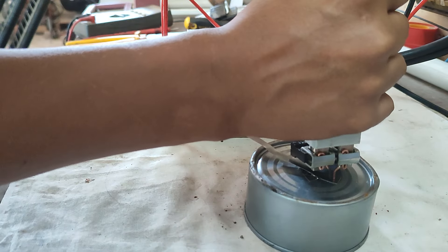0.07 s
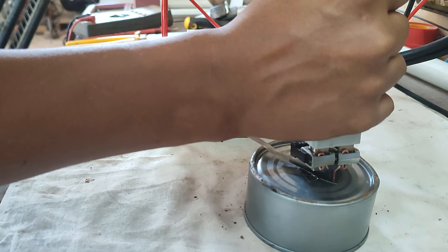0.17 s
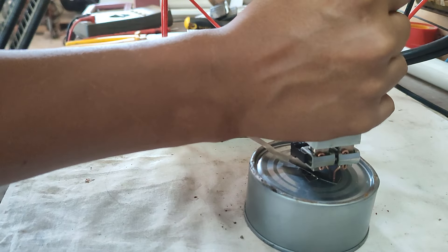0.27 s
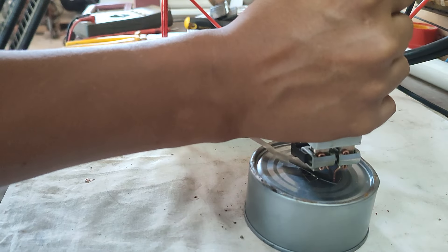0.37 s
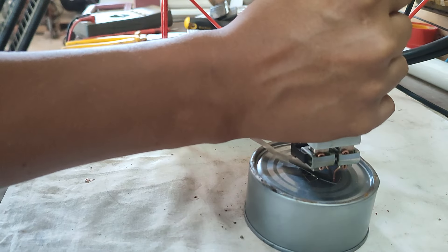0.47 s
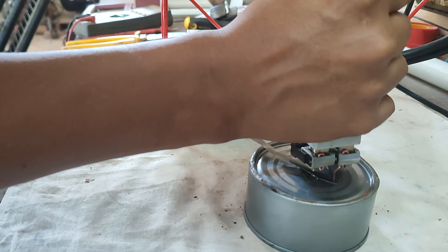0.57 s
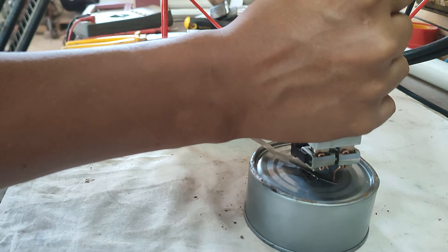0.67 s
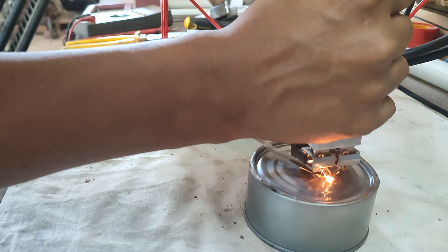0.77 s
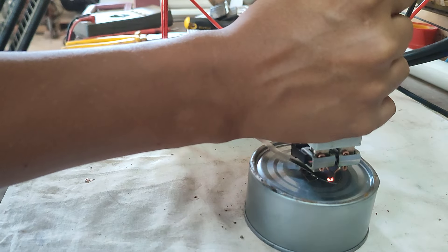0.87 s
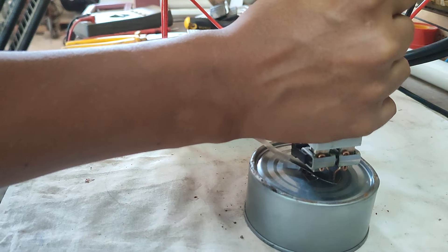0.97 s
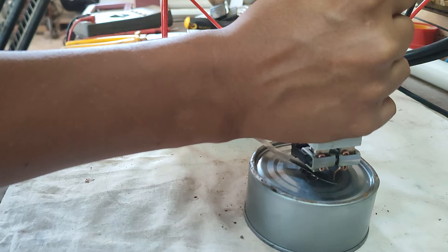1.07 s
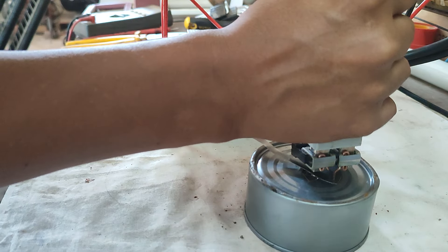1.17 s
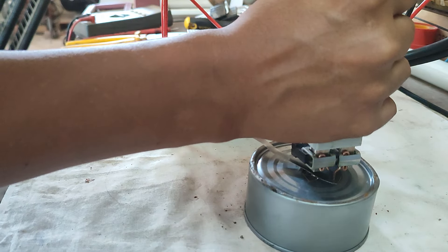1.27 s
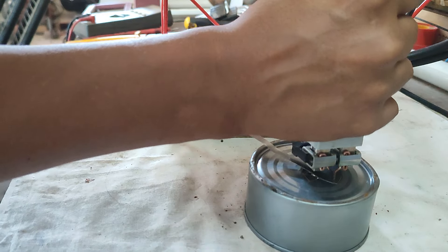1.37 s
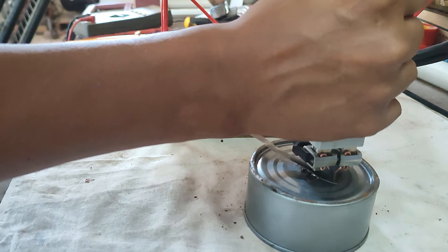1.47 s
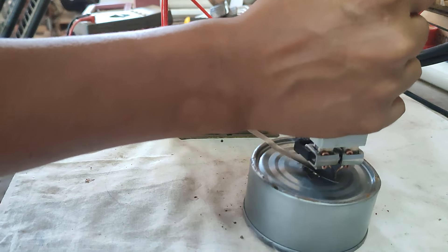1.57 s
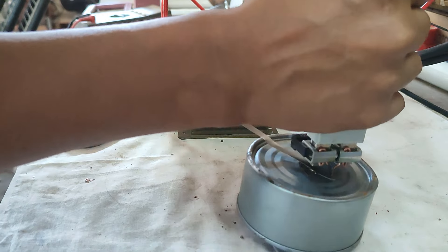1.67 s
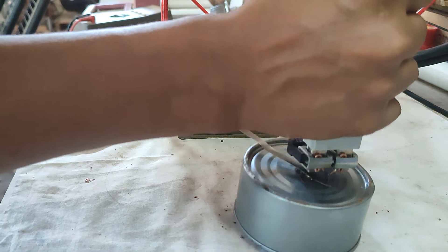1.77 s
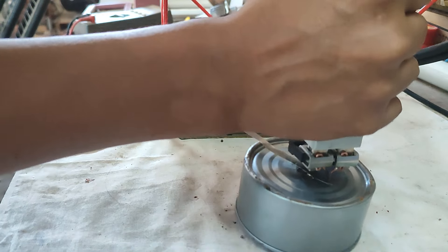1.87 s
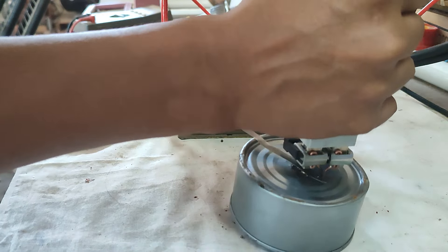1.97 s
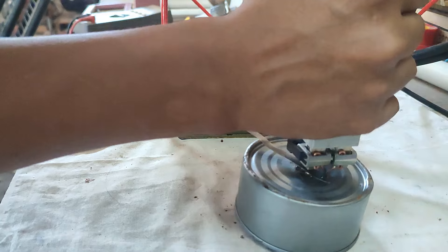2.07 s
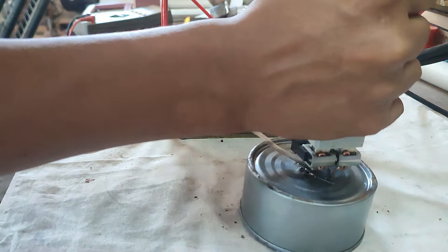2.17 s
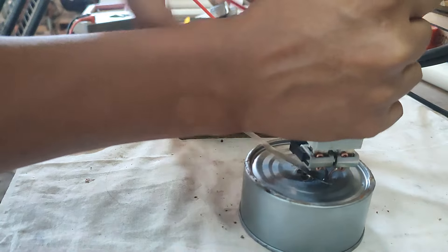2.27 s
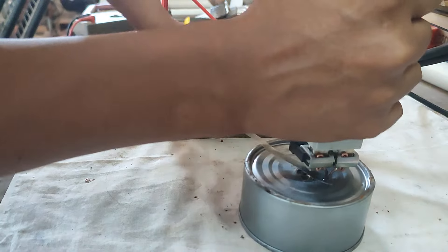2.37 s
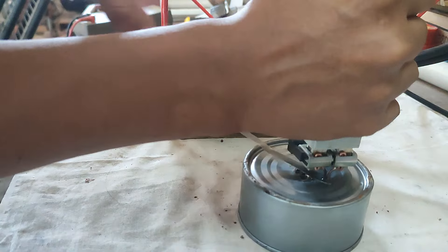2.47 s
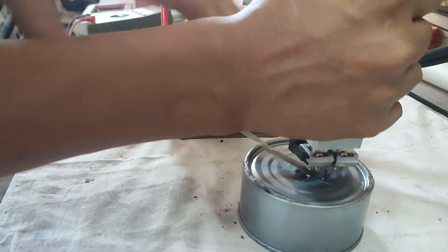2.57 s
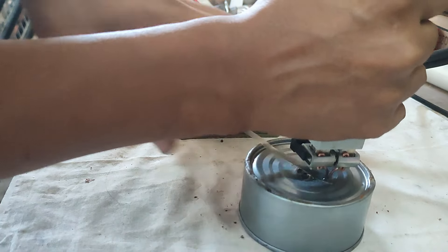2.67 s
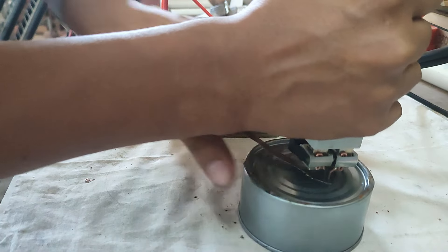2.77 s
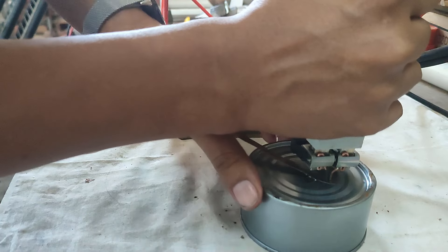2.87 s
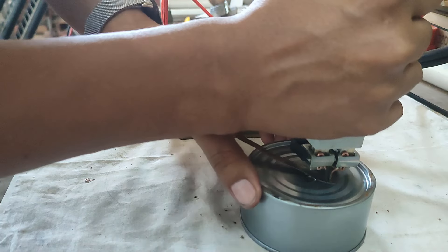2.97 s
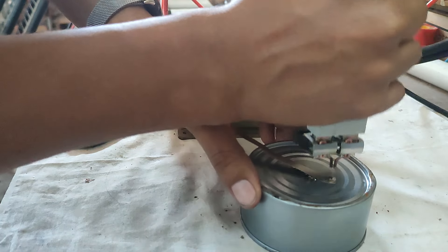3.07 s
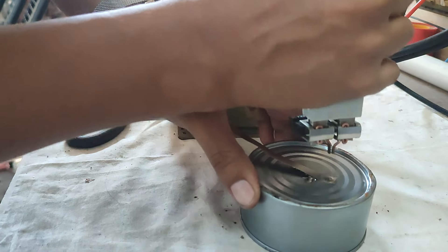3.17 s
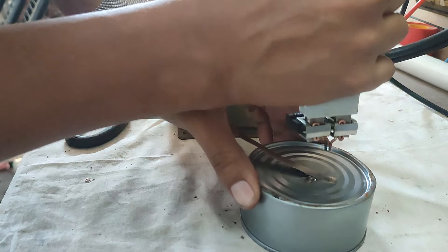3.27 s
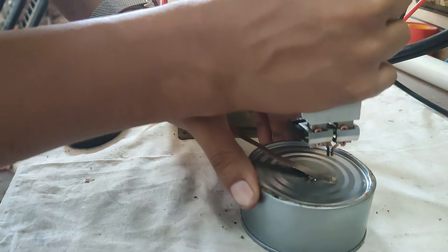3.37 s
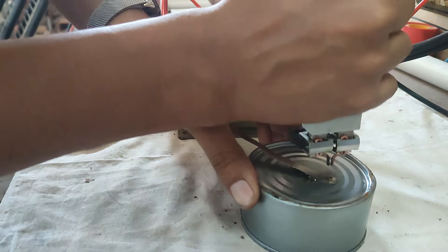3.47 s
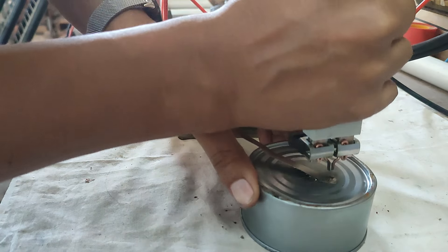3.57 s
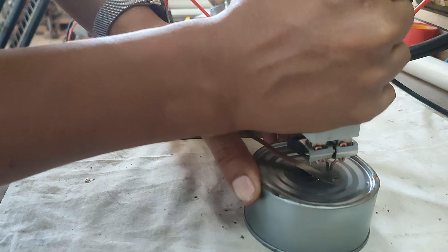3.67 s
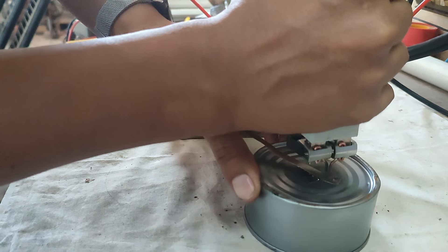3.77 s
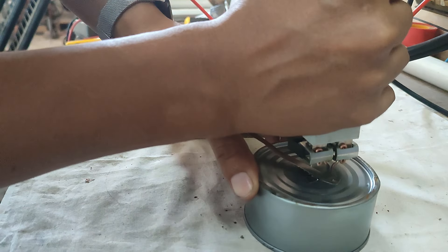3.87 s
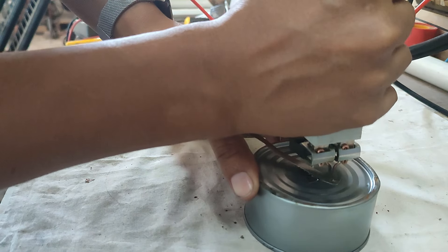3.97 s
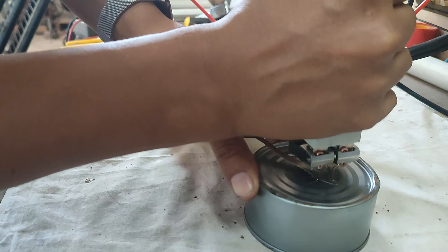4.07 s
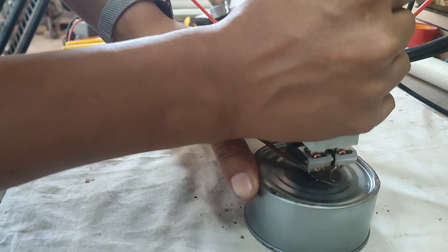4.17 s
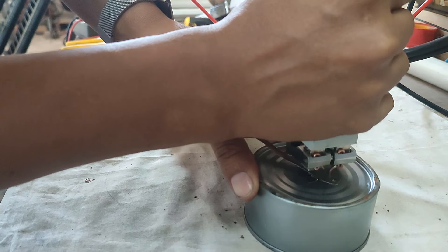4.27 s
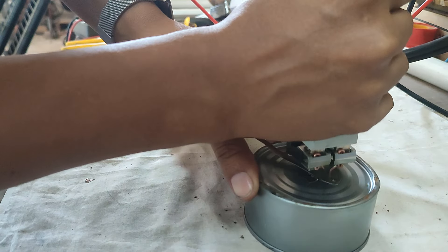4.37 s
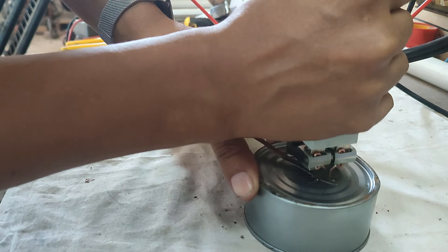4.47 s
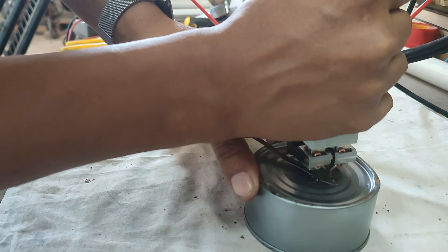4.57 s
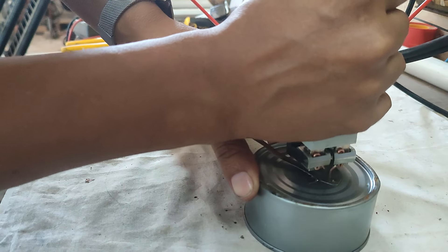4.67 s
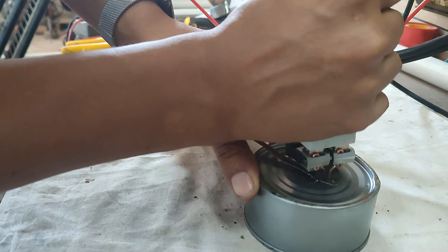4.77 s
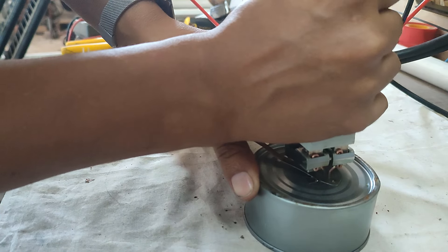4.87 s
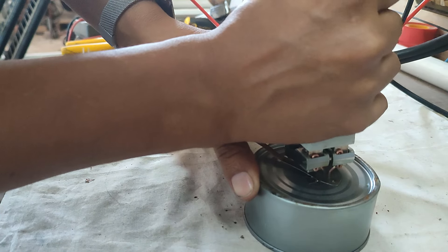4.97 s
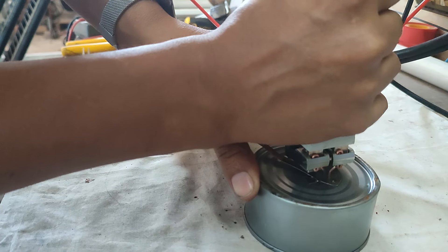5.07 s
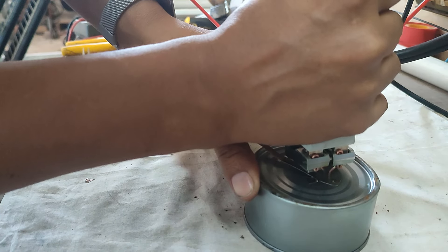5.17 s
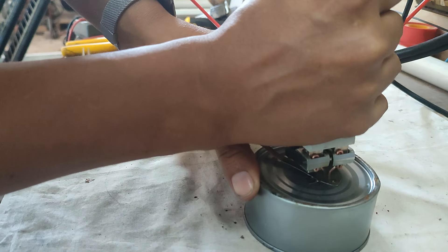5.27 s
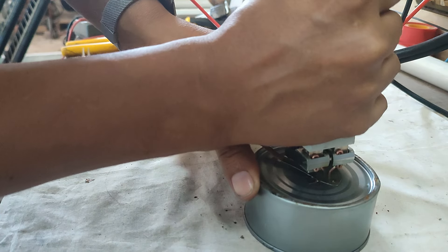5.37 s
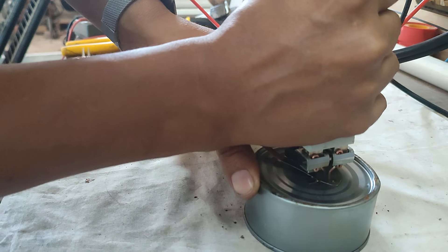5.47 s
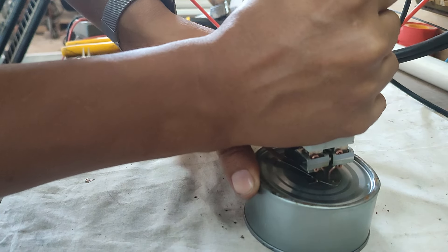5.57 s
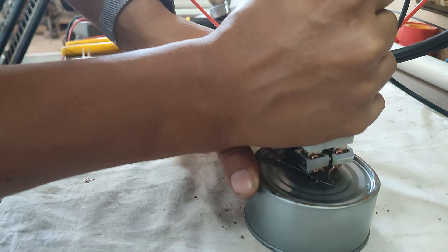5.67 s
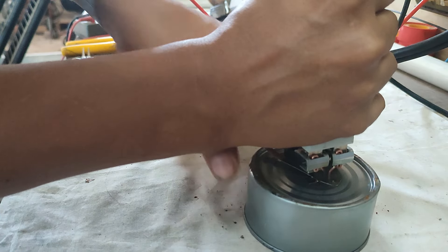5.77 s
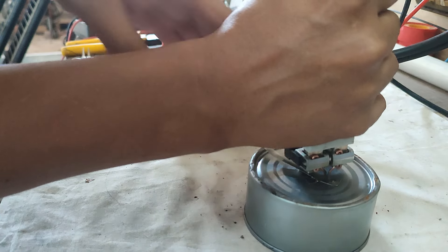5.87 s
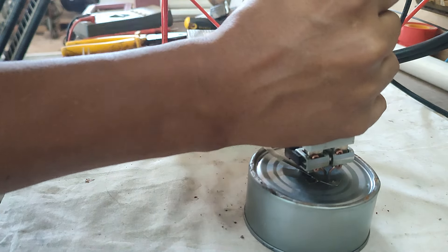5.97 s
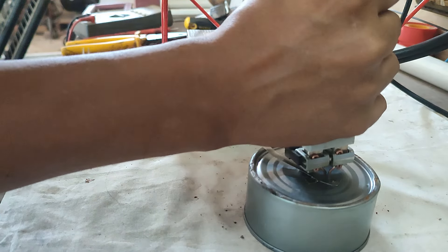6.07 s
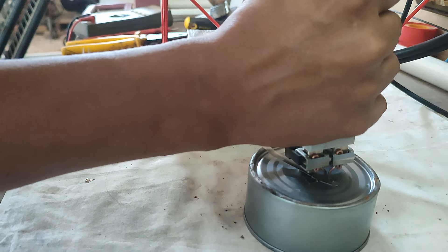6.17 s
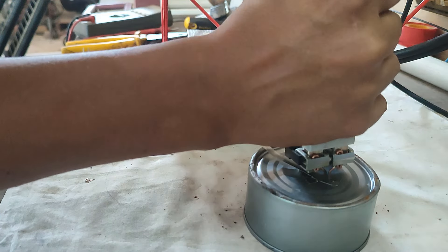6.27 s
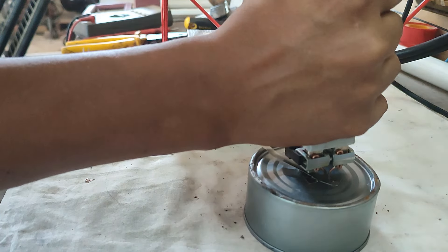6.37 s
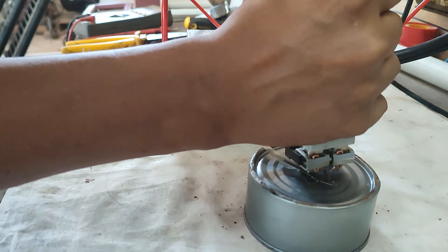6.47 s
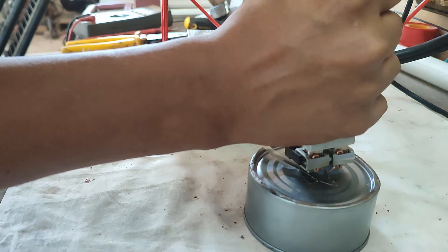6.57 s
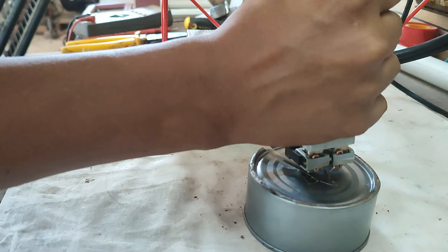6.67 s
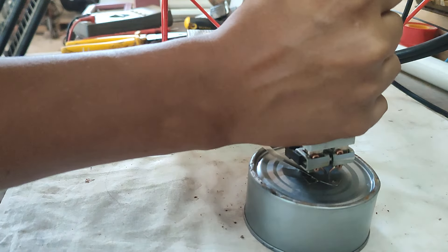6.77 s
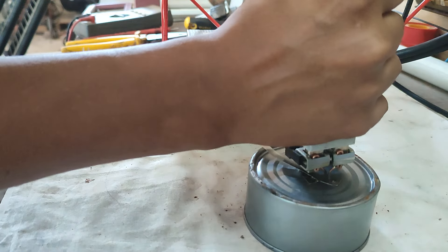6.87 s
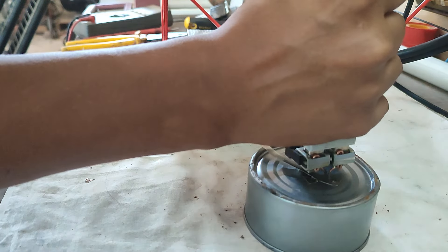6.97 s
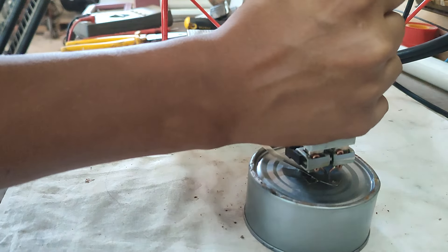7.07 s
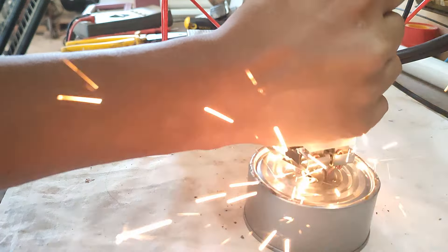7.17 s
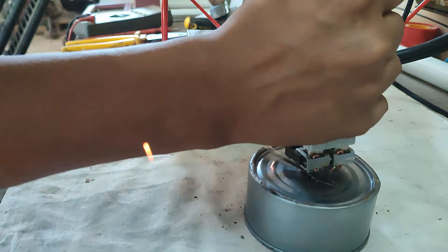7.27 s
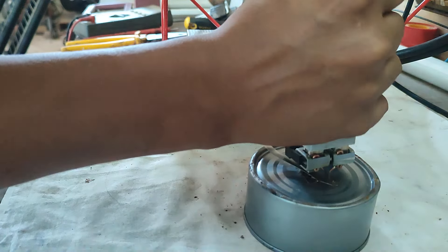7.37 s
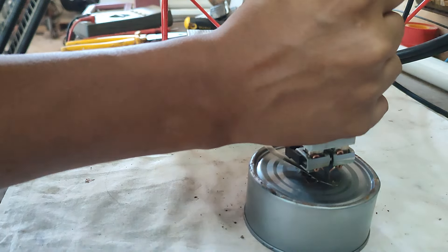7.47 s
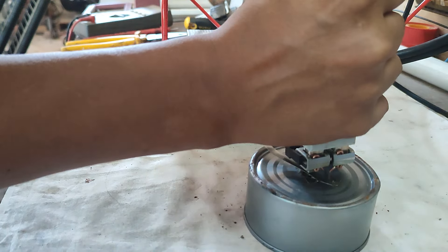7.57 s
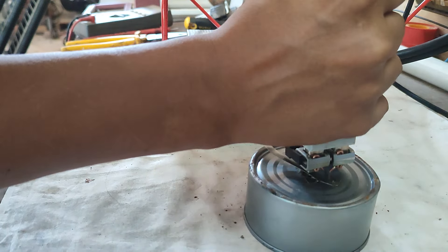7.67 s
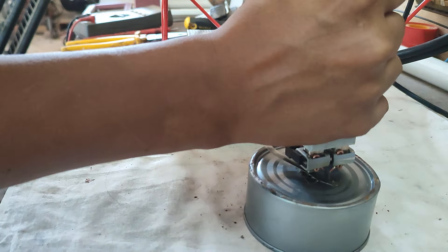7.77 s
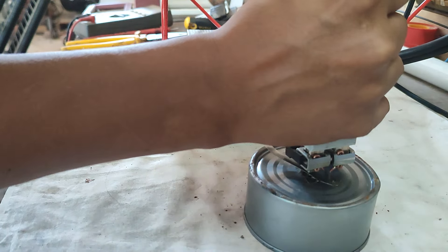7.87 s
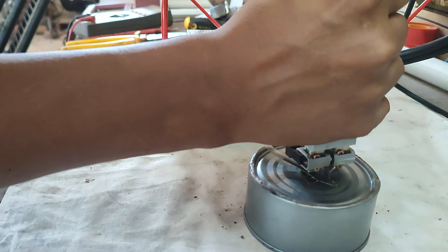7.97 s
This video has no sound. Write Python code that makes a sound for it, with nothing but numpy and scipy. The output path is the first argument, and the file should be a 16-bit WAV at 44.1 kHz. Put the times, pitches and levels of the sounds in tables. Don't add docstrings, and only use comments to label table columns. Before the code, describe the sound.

Soft taps and dull electric buzz on thin tin, hollow knocks and cloth rubbing, then a very loud dry spark crack and short sizzle.

```python
import sys
import numpy as np
from scipy import signal
from scipy.io import wavfile
from scipy.ndimage import uniform_filter1d

SR = 44100
rng = np.random.default_rng(int(sys.argv[2]) if len(sys.argv) > 2 else 0)


def invert_db(level):
    return 10 ** (np.asarray(level, dtype=float) / 20)


def wrap_up_sound(samples):
    columns = np.atleast_2d(samples).T
    tamed = np.clip(columns, -1, 1)
    steps = np.round(tamed * 32767).astype(np.int16)
    wavfile.write(sys.argv[1], SR, steps)


N = 352976

TAP_MS, KNOCK_MS, PEEL_MS, BRUSH_MS = 0.49, 1, 1, 7.4
# start_s, ring_db, crack_db, crack_hz, left_right_db
KNOCKS = [
    (2.2993, -40, -41.5, 2070, -2),
    (2.3232, -24, -32.5, 1500, -3),
]


def rms_one(x):
    return x / np.sqrt(np.mean(x ** 2) + 1e-20)


def at_hz(points, hz):
    points = np.array(points)
    return np.interp(np.log(hz), np.log(points[:, 0]), points[:, 1])


def sides(pan_db):
    return invert_db(np.array([[.5], [-.5]]) * pan_db)


def add(out, s, sound):
    at = int(round(s * SR))
    out[:, at:at + sound.shape[1]] += sound[:, :N - at]


def drift(rate):
    r = np.exp(-80 * np.pi * rate / SR)
    slow = signal.lfilter([1], [1, -2 * r, r * r], rng.standard_normal(N // 40 + 2002))[2000:]
    return np.interp(np.arange(N) / 40, np.arange(len(slow)), rms_one(slow))


def band_pass(x, order, edges):
    return signal.sosfilt(signal.butter(order, edges, "band", fs=SR, output="sos"), x)


def resonate(x, hz, width):
    r = np.exp(-np.pi * width / SR)
    return signal.lfilter(np.array([1, 0, -1]) * (1 - r * r) / 2, [1, -2 * r * np.cos(2 * np.pi * hz / SR), r * r], x)


def pair():
    return rng.standard_normal((2, N))


def spread(x, hz):
    # pitch_hz, left_right_likeness
    likeness = [(60, 0.92), (180, 1), (550, 0.1), (1650, -0.14), (4970, -0.035), (15000, -0.11)]
    # pitch_hz, left_right_db
    lean = [(60, -1.5), (240, -2.5), (950, 0), (3770, -2.5), (15000, -1.5)]
    alike = np.clip(at_hz(likeness, hz), -1, 1)
    shared = np.sqrt(1 + alike) * x[0]
    opposed = np.sqrt(1 - alike) * x[1] * [[1], [-1]]
    return (shared + opposed) * sides(at_hz(lean, hz))


def banded_noise(spectrum, patchy_db):
    out, white = 0, [pair(), pair()]
    edges = 28 * 2 ** np.arange(0, 9.6, .5)
    for k, (low, high) in enumerate(zip(edges, edges[1:])):
        hz = np.sqrt(low * high)
        level_db = at_hz(spectrum, hz)
        if level_db > -60:
            band = band_pass(white[k % 2], 2, [low, high])
            flicker = invert_db(patchy_db * drift(7.4))
            out = out + invert_db(level_db) * flicker * spread(band, hz)
    return out / np.std(out.mean(axis=0))


def burst(hz, t60, octaves=1.5):
    t = np.arange(SR // 5) / SR
    noise = rng.standard_normal((3, len(t)))
    half = 2 ** (octaves / 2)
    edges = np.clip([hz / half, hz * half], 50, 19000)
    return rms_one(band_pass(noise[0] + 3.9 * noise[1:], 2, edges)) * invert_db(-60 * t / t60)


def struck(modes, hits, contact_ms, uneven_db=5.5, turn=1.53, split=0.0253):
    out, t = np.zeros((2, N)), np.arange(SR // 3) / SR
    hz, mode_db, t60 = np.repeat(np.transpose(modes), 3, axis=1)[:, :, None]
    detuned = (np.arange(len(hz)) % 3 > 0)[:, None]
    hz = hz * (1 + split * rng.uniform(-0.924, 1, hz.shape) * detuned)
    angle = turn * rng.standard_normal(hz.shape)
    waves = np.array([np.sin(2 * np.pi * hz * t + side * angle) for side in (.5, -.5)])
    dying = invert_db(mode_db - 60 * t / t60) * waves
    rise = 1 - np.exp(-1000 * t / contact_ms)
    for s, ring_db, crack_db, crack_hz, pan_db in hits:
        heights = invert_db(ring_db - 7.0 + uneven_db * rng.standard_normal(len(hz)))
        add(out, s, heights @ dying * rise * sides(pan_db))
        add(out, s, invert_db(crack_db) * burst(crack_hz, 0.047, octaves=2.83) * sides(pan_db))
    return out


def dry_contacts(rows, t60, dulling=0):
    out = np.zeros((2, N))
    for s, db, hz, pan_db in rows:
        fade = t60 * (4000 / hz) ** dulling
        add(out, s, invert_db(db) * burst(hz, fade, octaves=1.37) * sides(pan_db))
    return out


def swells(rows, width_hz=0, width_share=0):
    out, white = np.zeros((2, N)), pair()
    for s, length, hz, db in rows:
        reach, width = length + .2, width_hz + width_share * hz
        t = np.arange(-reach, reach, 1 / SR)
        noise = np.roll(white, -int(s * SR), axis=1)[:, :len(t)]
        tone = spread(rms_one(resonate(resonate(noise, hz, width), hz, width)), hz)
        add(out, s - reach, invert_db(db) * tone * np.exp(-(2 * t / length) ** 2))
    return out


def background():
    # time_s, level_db
    nearness = [(0.0, -59), (0.89, -59.5), (1.83, -60.5), (2.41, -58.5), (4.12, -57.5), (4.63, -57),
                (6.13, -55), (6.57, -56.5), (6.91, -55), (8.0, -56)]
    # pitch_hz, level_db_per_hz
    air = [(15, -37), (25, 2), (57, -0.5), (91, -13), (187, -16), (220, -5), (252, -16), (296, -19.5),
           (320, -19), (419, -24), (644, -28), (938, -27), (1370, -33.5), (3220, -45), (15300, -51)]
    # pitch_hz, width_hz, level_db
    drones = [(59.2, 17, -63), (104.6, 11.2, -65.5), (160, 5.9, -72.5), (223.5, 11, -73.5),
              (420, 65, -74.5)]
    near_db = np.interp(np.arange(N) / SR, *np.transpose(nearness))
    out = invert_db(-56.5) * banded_noise(air, patchy_db=2.5)
    for hz, width, db in drones:
        follows = 0.7 if hz < 80 else 1.3
        swell_db = follows * (near_db - near_db.mean())
        out += invert_db(db + swell_db + 1.72 * drift(1.8)) * spread(rms_one(resonate(pair(), hz, width)), hz)
    return out


def rubbing():
    # fastest_s, build_up_s, slowing_s, rub_db, hiss_above_rub_db
    moves = [(.91, 0.45, 0.31, -72, 0), (1.7, 0.32, 0.97, -75, -3.5), (2.2, 0.27, 0.072, -74.5, 0.5),
             (2.47, 0.2, 0.27, -67.5, -14.5), (2.99, 0.098, 0.68, -55.5, -11),
             (3.5, 0.097, 0.55, -61.5, -9), (3.78, 1.3, 0.99, -56, -7), (4.3, 0.22, 0.98, -73, -3),
             (5.122, 0.2, 0.54, -78.5, 12), (5.27, 0.17, 0.84, -68.5, -7), (6.8, 0.64, 1, -76, -7),
             (7.4, 0.31, 0.53, -66, -17)]
    # pitch_hz, level_db_per_hz
    rub_colour = [(350, -7), (600, -3.5), (1280, -7), (1970, -4), (2590, 4.5), (3000, -1), (5280, -8),
                  (7090, -5), (9000, -19.5), (11700, -44), (19800, -120)]
    # pitch_hz, level_db_per_hz
    hiss_colour = [(3000, -86), (5000, -11.5), (8000, 8), (12500, -11), (18000, 4.5)]
    t = np.arange(0, N + 64, 64) / SR
    rub, hiss = invert_db(2 * -80), invert_db(2 * -86)
    for s, build_up, slowing, db, bright_db in moves:
        power = invert_db(2 * (db - 20 * np.maximum((s - t) / build_up, (t - s) / slowing)))
        rub, hiss = rub + power, hiss + power * invert_db(2 * bright_db)
    rub, hiss = (np.sqrt(np.interp(np.arange(N) / SR, t, p)) for p in (rub, hiss))
    friction = rub * banded_noise(rub_colour, patchy_db=1.7) + hiss * banded_noise(hiss_colour, patchy_db=2.0)
    stutter_db, stutter_per_s = 1.24, 27
    return friction * invert_db(stutter_db * drift(stutter_per_s))


def pressed_can():
    # pitch_hz, level_db, t60_s
    damped_modes = [(553, -16, 0.13), (616, -4, 0.034), (755, -13, 0.028), (830, -3, 0.034), (914, 1, 0.07),
                    (913, -22, 0.1), (1096, -12, 0.11), (1260, -7.5, 0.023), (1475, -11, 0.072),
                    (1800, -16, 0.045), (2880, -16, 0.019), (4290, -29.5, .08), (7014, -21.5, 0.063)]
    # start_s, ring_db, crack_db, crack_hz, left_right_db
    presses = [(0.8011, -45, -54.5, 3100, -5), (0.8097, -41.5, -73, 1500, 5), (0.824, -47, -69, 3000, -10),
               (0.9125, -47, -57, 5040, -3), (0.9634, -51, -72, 1800, -8), (0.978, -54.5, -71, 4500, -3),
               (7.2385, -45.5, -50, 4000, 4), (7.261, -51, -60, 3020, 1)]
    return struck(damped_modes, presses, TAP_MS)


def weld_hum():
    # pitch_hz, level_db
    orders = [(100, 2), (200, -10), (300, -14.5), (400, -21), (500, -16)]
    start_s, attack_s, hold_s, release_s = .805, 0.02, 0.18, 0.068
    hum_db, sag_db_per_s = -45, 86
    since, out = np.arange(SR // 2) / SR, np.zeros((1, N))
    tone = sum(invert_db(db) * np.sin(2 * np.pi * hz * (since + start_s - .0105)) for hz, db in orders)
    gate = np.clip(np.minimum(since / attack_s, 1 - (since - attack_s - hold_s) / release_s), 0, 1)
    level_db = hum_db - sag_db_per_s * np.clip(since - attack_s, 0, 1)
    add(out, start_s, (tone * gate ** 2 * invert_db(level_db))[None])
    return out


def buzzing_lid():
    # pitch_hz, level_db, t60_s
    lid_modes = [(920, -4, .05), (980, -6.5, 0.0584), (1500, -13, 0.036), (2786, -13.5, .04)]
    # start_s, ring_db, crack_db, crack_hz, left_right_db
    shakes = [(0.832, -58, -70, 1500, 0), (.855, -53, -72, 1500, -1), (.871, -53, -76, 2500, -1),
              (.891, -54, -72, 2000, -1), (.900, -57, -72, 2500, -1), (.926, -55, -77, 2500, 2),
              (.945, -62, -65, 3200, -6), (1.004, -56, -75, 2000, -5), (7.262, -53, -75, 1500, 3),
              (7.345, -66, -60, 2400, -3)]
    return struck(lid_modes, shakes, TAP_MS, uneven_db=3.5)


def tip_chatter():
    # start_s, level_db, centre_hz, left_right_db
    chatter = [(0.844, -56, 776, 3), (0.868, -58, 766, -7), (.888, -60, 900, -7), (0.965, -56.5, 1800, 3),
               (0.978, -62.5, 4730, -7), (.992, -64, 3480, -6), (1.89, -62, 580, -4),
               (2.921, -58, 2000, -5), (3.02, -54, 302, -4), (3.028, -52.5, 6030, -10)]
    return dry_contacts(chatter, t60=0.072)


def engine_revs_and_whispers():
    # mid_s, length_s, pitch_hz, level_db
    revs = [(2.352, .17, 102, -57.5), (2.68, 0.22, 103, -57.5), (6.099, 0.79, 420, -70),
            (6.6, 0.37, 222, -66), (7.32, 0.21, 160, -61)]
    # mid_s, length_s, pitch_hz, level_db
    whispers = [(4.9, 0.27, 910, -74.5), (6.01, 0.32, 900, -75), (7.948, 0.13, 5510, -79)]
    return swells(revs, width_hz=16) + swells(whispers, width_share=0.2)


def singing_can():
    # mid_s, length_s, pitch_hz, level_db
    songs = [(1.808, 0.053, 1630, -78), (2.08, 0.062, 1490, -86), (3.05, 0.17, 2880, -77),
             (3.097, 0.25, 1490, -66.5), (3.33, 0.44, 997, -65.5), (3.33, 0.27, 2880, -66),
             (3.617, 0.18, 980, -63.5), (3.641, 0.13, 3520, -61.5), (3.646, 0.086, 690, -64.5),
             (3.696, 0.38, 1125, -68.5), (3.78, 0.2, 1470, -71), (4.008, 0.21, 2310, -68.5),
             (4.572, 0.05, 1290, -67.5), (7.38, 0.32, 980, -75), (.93, 0.24, 945, -74),
             (1.7, 0.12, 2590, -78), (3.4, 0.38, 1560, -72.5)]
    return swells(songs, width_hz=130)


def freed_tips():
    # pitch_hz, level_db, t60_s
    tip_modes = [(2850, 1, 0.083), (4500, 1.5, 0.069), (5200, -5, .07)]
    # start_s, ring_db, crack_db, crack_hz, left_right_db
    release = [
        (0.978, -63.5, -80, 4000, -2),
    ]
    return struck(tip_modes, release, TAP_MS, uneven_db=0.0, split=0.0093)


def clicks():
    # start_s, level_db, centre_hz, left_right_db
    small_clicks = [(1.1887, -71, 9000, 1), (1.885, -61.5, 9100, -2), (2.949, -64, 12500, -4),
                    (4.14, -55, 6740, -10), (5.638, -61, 7000, -4), (5.7902, -61, 6280, -4),
                    (6.068, -66, 14500, 7)]
    return dry_contacts(small_clicks, t60=0.041)


def rocked_can():
    # pitch_hz, level_db, t60_s
    rim_modes = [(557, 8, 0.011), (830, 4, 0.059), (1700, -2.5, 0.046), (2060, -7, 0.034),
                 (2530, -10, 0.47), (2670, -5.5, 0.2), (3080, -18, 0.24), (3570, -24, 0.14),
                 (4700, -18, 0.14), (5570, -20, 0.096), (5900, -10, 0.098)]
    # start_s, ring_db, crack_db, crack_hz, left_right_db
    rocks = [
        (1.6063, -46.5, -51, 3970, 1.2),
    ]
    return struck(rim_modes, rocks, TAP_MS, uneven_db=2.5, turn=1.2, split=.018)


def strip_end():
    # pitch_hz, level_db, t60_s
    end_modes = [(790, 2, 0.062), (908, 1.5, 0.042), (1470, 2.5, 0.32), (1650, -5, 0.21), (2580, -12, .12),
                 (2940, -14, 0.092), (4760, -18, .06), (5350, -21, .08)]
    # start_s, ring_db, crack_db, crack_hz, left_right_db
    taps = [
        (1.702, -54, -61, 3350, 0),
    ]
    brushes = [(1.762, -61, -81, 2000, -1), (1.996, -55, -87, 2500, 1), (2.02, -56, -76, 1500, -3)]
    return struck(end_modes, brushes, BRUSH_MS, uneven_db=2) + struck(end_modes, taps, TAP_MS, uneven_db=2)


def can_shell():
    # pitch_hz, level_db, t60_s
    wall_modes = [(2550, -32, 0.22), (3060, -21.5, 0.18), (3560, -21.5, 0.32), (4080, -18.5, 0.12),
                  (4370, -27, .15), (4700, -25, 0.35), (4800, -28, 0.13), (5060, -26, 0.23),
                  (5250, -26.5, 0.43), (5430, -18, .15), (5700, -27, 0.092), (6540, -35, 0.15),
                  (6640, -37, .2), (7050, -32, 0.22)]
    # pitch_hz, level_db, t60_s
    base_modes = [(550, -21.5, 0.26), (590, -22, 0.43), (629, -18.5, 0.24), (730, -23, .25),
                  (882, -25, 0.23), (1007, -21, .15), (3100, -28, 0.26), (4370, -22, 0.22), (5740, -21, .1),
                  (6800, -29, .2)]
    # start_s, ring_db, crack_db, crack_hz, left_right_db
    wall_taps = [
        (1.703, -48, -72, 4500, -5),
    ]
    crackless = [(s, db, -120, hz, pan_db) for s, db, _, hz, pan_db in KNOCKS]
    wall = struck(wall_modes, crackless + wall_taps, TAP_MS, uneven_db=1.5, split=0.0125)
    return wall + struck(base_modes, crackless, KNOCK_MS, uneven_db=0.5, split=0.013)


def knocked_can():
    # pitch_hz, level_db, t60_s
    free_modes = [(616, -12, 0.098), (570, -18, 0.11), (705, -10, 0.057), (764, 3.5, 0.058),
                  (846, -23, 0.42), (930, -17, 0.2), (956, -13.5, 0.25), (812, -5.5, 0.15),
                  (1200, -19, 0.067), (1500, -6.5, 0.16), (1598, 0.5, 0.089), (1740, -18, 0.26),
                  (2110, -20, 0.17), (2590, -20, .07), (2516, -15.5, 0.43), (2576, -4.5, 0.08),
                  (784, -19, 0.62), (3510, -12.5, 0.1), (1523, -14.5, 0.31), (4880, -8, 0.023),
                  (4500, -14, 0.034), (4950, -13, 0.045), (5240, -12, 0.04), (5870, -16, 0.056),
                  (6430, -21.5, 0.071), (6900, -26, 0.086)]
    return struck(free_modes, KNOCKS, KNOCK_MS, uneven_db=2.5, turn=1.6, split=.011)


def rattle():
    # start_s, level_db, centre_hz, left_right_db
    rattles = [(2.323, -35, 9400, -2), (2.323, -41.5, 4700, -6), (2.328, -51, 2700, -1),
               (2.3, -43, 8000, -3)]
    return dry_contacts(rattles, t60=0.23, dulling=1.76)


def peeling_strip():
    # pitch_hz, level_db, t60_s
    strip_modes = [(786, -5.5, 0.074), (1200, -13, 0.033), (1470, 5, 0.092), (1632, -6, 0.04),
                   (1830, 0, 0.066), (2410, -12.5, 0.092), (2880, -11.5, 0.12), (3410, -8.5, .12),
                   (5090, -8.5, 0.035), (5240, -16, 0.061), (7547, -6, 0.077)]
    # start_s, ring_db, crack_db, crack_hz, left_right_db
    peels = [(2.9283, -52, -40, 487, 3), (2.932, -41.5, -44.5, 4000, -3), (2.940, -41.5, -45.5, 3000, -4.5),
             (2.948, -45, -41, 9050, -3), (2.972, -56, -53, 11000, -8)]
    return struck(strip_modes, peels, PEEL_MS, uneven_db=3, turn=1.2, split=.01)


def nudged_can():
    # pitch_hz, level_db, t60_s
    nudged_modes = [(450, 2, .03), (800, 1, .04), (1220, 1, 0.075), (1340, -6, .15), (2400, -14, .04),
                    (6000, -11, .05)]
    # start_s, ring_db, crack_db, crack_hz, left_right_db
    nudges = [
        (4.434, -58, -77, 1200, -4),
        (4.546, -56, -68, 1300, -3),
    ]
    return struck(nudged_modes, nudges, KNOCK_MS, uneven_db=3.0, split=.015)


def held_can():
    # pitch_hz, level_db, t60_s
    held_modes = [(602, -5.5, 0.054), (724, 2, 0.018), (1214, 2, 0.025), (1643, -9.5, 0.13),
                  (2180, -15.5, 0.042), (2820, -23, 0.1), (3450, -16, 0.12), (4100, -21, 0.08),
                  (4540, -19.5, 0.062)]
    # start_s, ring_db, crack_db, crack_hz, left_right_db
    grips = [
        (4.4477, -31, -45, 3100, -2),
        (4.5453, -66, -59.5, 1200, 0),
        (5.807, -55.5, -66, 1500, -2),
    ]
    return struck(held_modes, grips, TAP_MS, uneven_db=2.5, turn=1.4, split=.014)


def spark():
    # start_s, peak_db, width_ms
    fronts = [
        (7.24839, -10, .027),
        (7.24897, 2.8, .027),
        (7.25452, -11, .022),
    ]
    # pitch_hz, level_db, t60_s, right_lag_rad, left_right_db
    metal = [(157, -42, .06, .2, 0), (975, -37, .05, .5, 5), (1685, -28.5, .010, .8, 0),
             (2650, -29, .006, 1.2, 12), (3500, -31, .010, 1.4, -2), (5060, -25, .006, 1.5, -12),
             (6700, -27.5, 0.02, 2.0, -3), (7700, -28, .005, 2.2, 4), (14700, -23, .008, 2.4, -2)]
    out, t = np.zeros((2, N)), np.arange(SR // 10) / SR
    rings = sum(invert_db(ring_db - 60 * t / t60) * np.sin(2 * np.pi * hz * t - [[0], [lag]]) * sides(pan_db)
                for hz, ring_db, t60, lag, pan_db in metal)
    for s, db, width_ms in fronts:
        x = 1000 * t / width_ms
        front = np.exp(-(2 * x - 2) ** 2) - .27 * np.exp(-((x - 3.9) / 1.5) ** 2)
        front = front - .5 * resonate(front, 2100, 900)
        front = signal.lfilter([1, -1], [1, -.92], front)
        add(out, s, invert_db(db) * (front + rings * (x > 2)))
        add(out, s, invert_db(db - 28) * burst(5500, .03, octaves=2.6))
    return out


def fizz():
    start_s, dries_s = 7.25, 7.48
    level_db, cools_db_per_s = -50.5, 58
    t = np.arange(SR // 2) / SR
    grains = rng.standard_normal((2, len(t))) * invert_db(1.9 * rng.exponential(1, len(t)))
    grains = grains * (rng.random(len(t)) < .3)
    bright = band_pass(grains, 1, [1700, 10000])
    drying_db = 200 * np.maximum(t + start_s - dries_s, 0)
    fade_db = level_db - cools_db_per_s * t - drying_db + 1.5 * np.exp(-t / 0.012)
    out = np.zeros((2, N))
    add(out, start_s, rms_one(bright) * invert_db(fade_db))
    return out


def spatter():
    # start_s, level_db, centre_hz, left_right_db
    drops = [(7.262, -38, 3300, 1.5), (7.333, -33, 9600, 0), (7.3325, -45, 6900, -2),
             (7.3455, -41.5, 2600, -11), (7.385, -51, 960, -3.5)]
    return dry_contacts(drops, t60=0.013)


def bead_ping():
    # start_s, pitch_hz, level_db, t60_s
    ping = (7.383, 4350, -47, .05)
    s, hz, db, t60 = ping
    return struck([(hz, 0, t60)], [(s, db, -70, hz, -2)], 4.5, uneven_db=-2.0, split=.005)


def workshop(x):
    # pitch_hz, t60_s
    room_t60 = [(250, 1), (1000, 0.73), (3000, 0.45), (6000, 0.48), (12000, 0.33)]
    t, tail = np.arange(SR) / SR, 0
    white = rng.standard_normal((2, SR))
    for low in 140 * 2 ** np.arange(7):
        band = band_pass(white, 2, [low, 2 * low])
        tail = tail + band * invert_db(-60 * t / at_hz(room_t60, low * np.sqrt(2)))
    tail = tail * np.clip((t - .006) / 0.025, 0, 1)
    tail = tail / np.sqrt(np.sum(tail ** 2) / 2)
    return signal.fftconvolve(x.mean(axis=0)[None], tail, axes=1)[:, :N]


def dropouts(x):
    # pitch_hz, rarity_in_spreads_above_mean
    holes = [(2000, 3.2), (4500, 1.9), (7600, 1.6), (8200, .45), (10000, .7), (12000, 1.0), (15000, 1.0)]
    hz, _, cells = signal.stft(x, SR, nperseg=1024)
    chance = rng.standard_normal(cells.shape[1:])
    chance = uniform_filter1d(chance, size=4, axis=0)
    chance = rms_one(uniform_filter1d(chance, size=9, axis=1))
    kept = np.where(chance > at_hz(holes, hz + 1)[:, None], invert_db(-30), 1)
    return signal.istft(cells * kept, SR, nperseg=1024)[1][:, :N]


def scene():
    # pitch_hz, width_hz, share_removed
    tin_gap = (9300, 2200, 0.72)
    hz, width, share = tin_gap
    near = pressed_can() + rocked_can() + strip_end() + knocked_can() + peeling_strip() + held_can()
    near = near + tip_chatter() + clicks() + rattle() + spatter()
    near = near - share * resonate(near, hz, width)
    shine = buzzing_lid() + freed_tips() + can_shell() + nudged_can() + bead_ping()
    arc = signal.sosfilt(signal.butter(2, 19500, fs=SR, output="sos"), spark())
    dulled_arc = signal.lfilter([.5, .5], [1], arc)
    echoes = invert_db(-13.5) * workshop(invert_db(-2.5) * near + dulled_arc)
    bed = background() + rubbing() + weld_hum() + engine_revs_and_whispers() + singing_can() + fizz() + echoes
    top = signal.ellip(8, .3, 60, 15250, fs=SR, output="sos")
    return signal.sosfilt(top, near + shine + dropouts(bed)) + arc


def top_cut(x):
    return signal.sosfilt(signal.butter(12, 17110, fs=SR, output="sos"), x)


def record(dry):
    # pitch_hz, width_hz, share_removed
    port_dip = (9100, 2000, .45)
    hz, width, share = port_dip
    heard = signal.sosfilt(signal.butter(4, 41, "high", fs=SR, output="sos"), dry)
    heard = heard - share * resonate(heard, hz, width)
    mix = signal.sosfiltfilt(signal.cheby2(6, 30, 17150, fs=SR, output="sos"), heard)
    return top_cut(mix)


dry = scene()
out = record(dry)
wrap_up_sound(out)
```